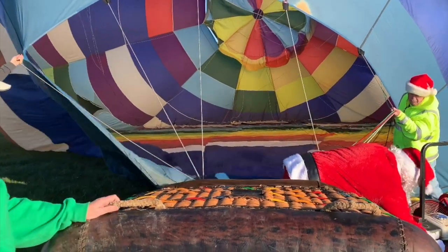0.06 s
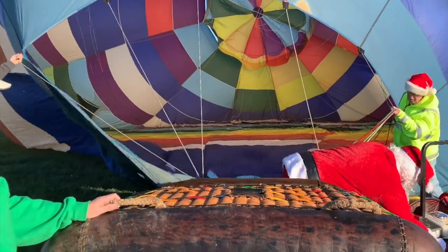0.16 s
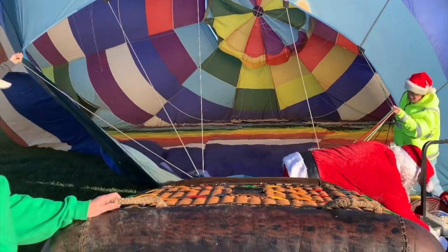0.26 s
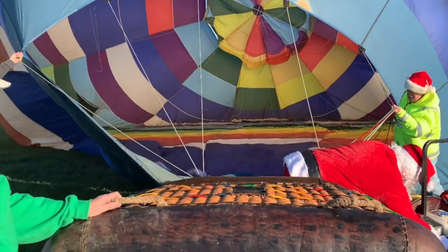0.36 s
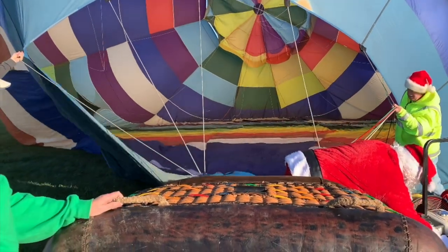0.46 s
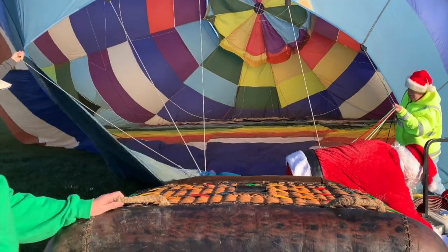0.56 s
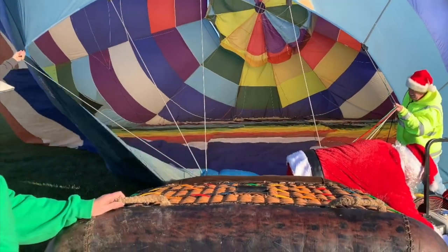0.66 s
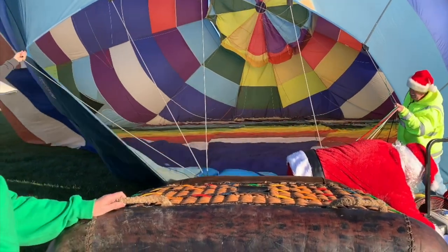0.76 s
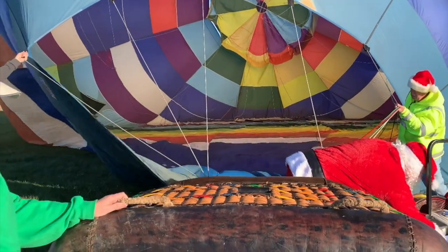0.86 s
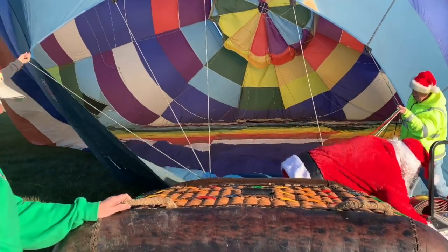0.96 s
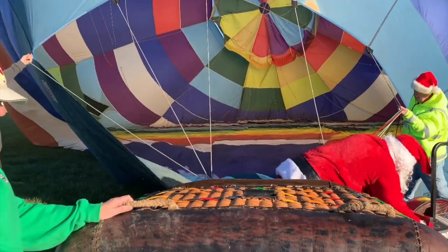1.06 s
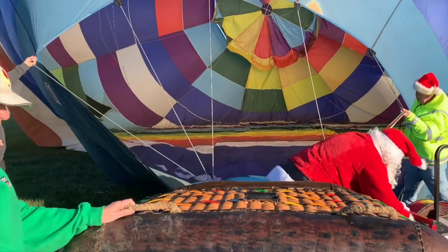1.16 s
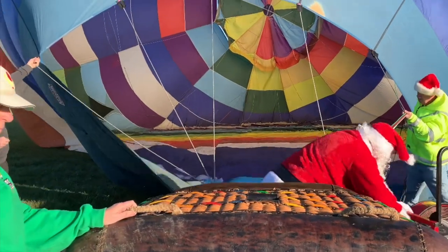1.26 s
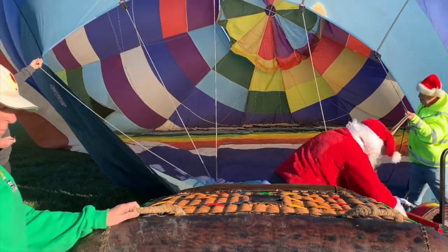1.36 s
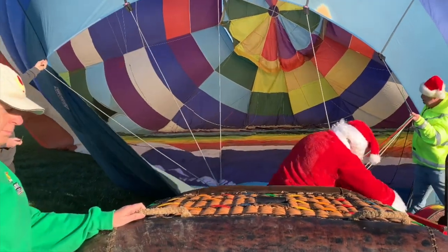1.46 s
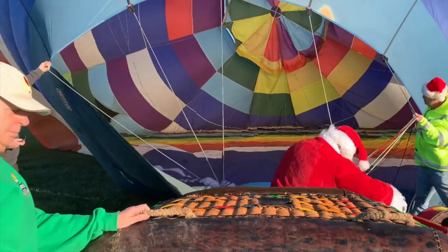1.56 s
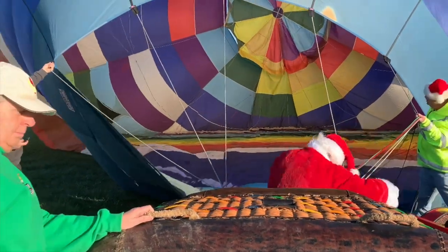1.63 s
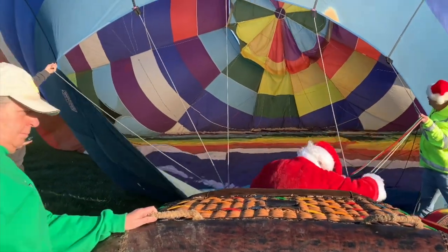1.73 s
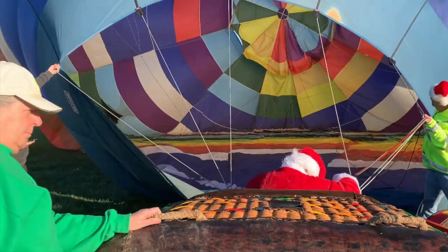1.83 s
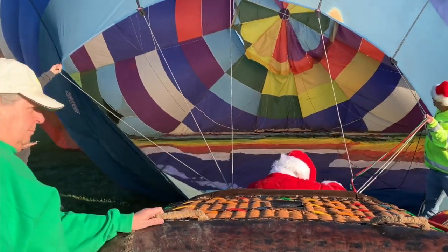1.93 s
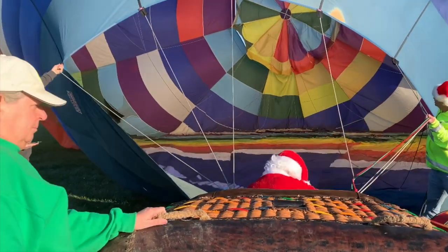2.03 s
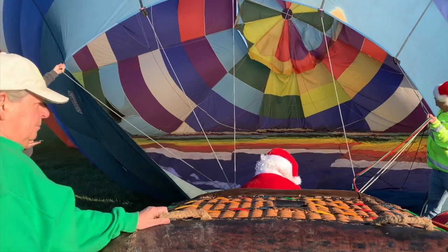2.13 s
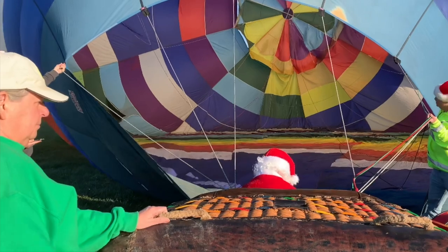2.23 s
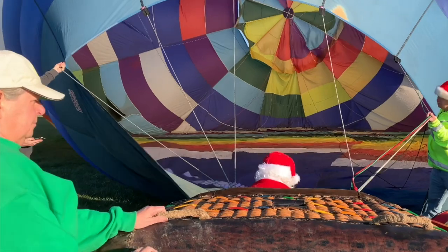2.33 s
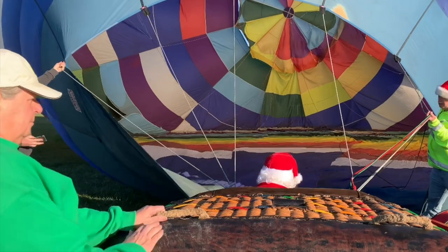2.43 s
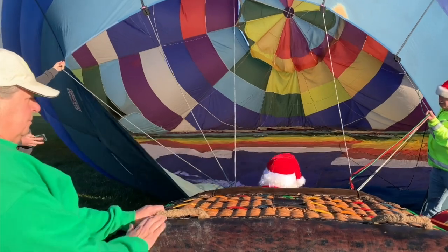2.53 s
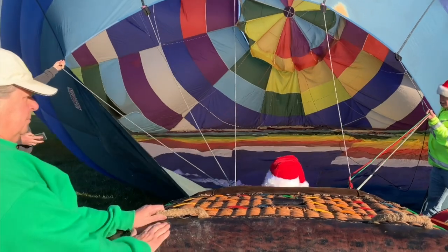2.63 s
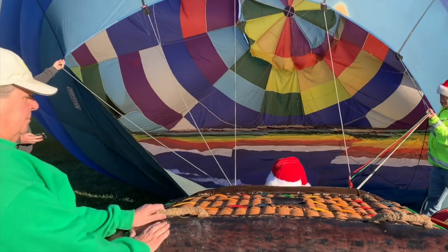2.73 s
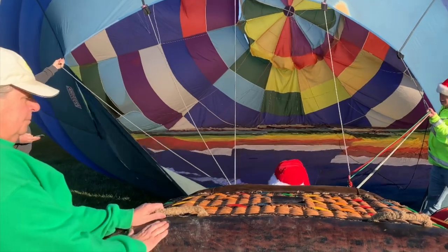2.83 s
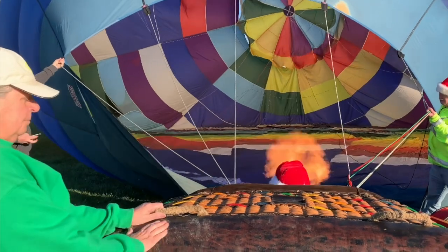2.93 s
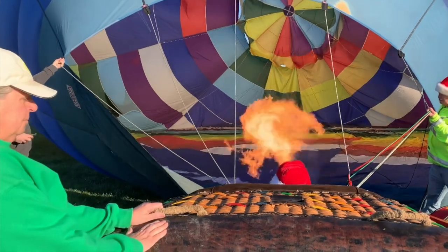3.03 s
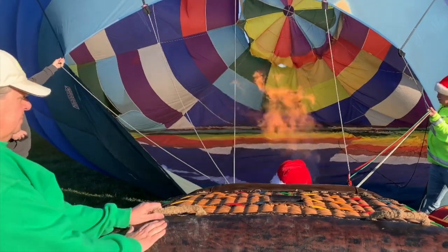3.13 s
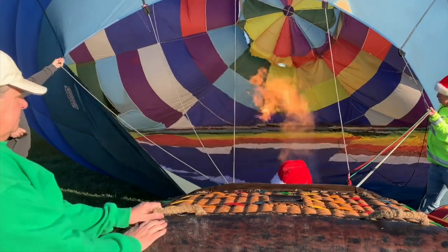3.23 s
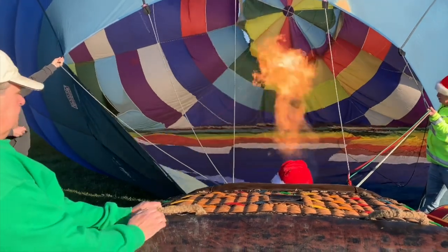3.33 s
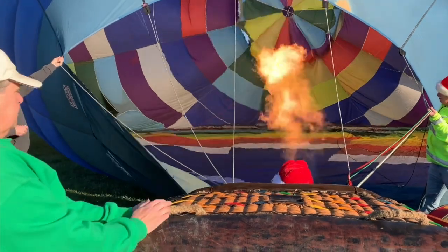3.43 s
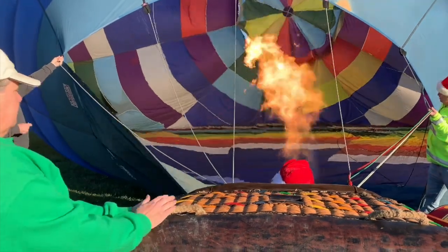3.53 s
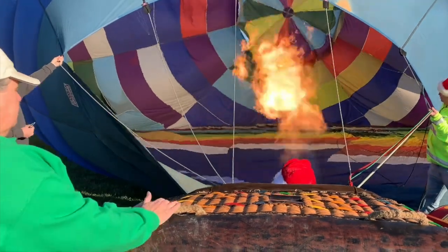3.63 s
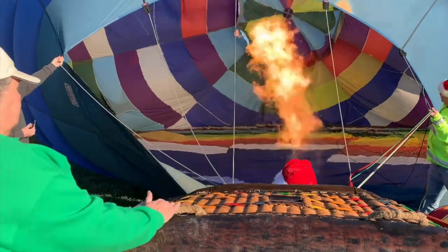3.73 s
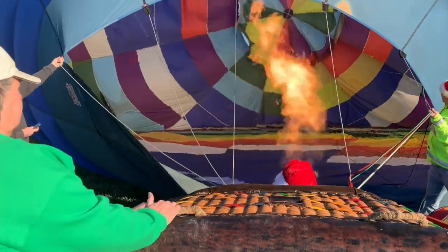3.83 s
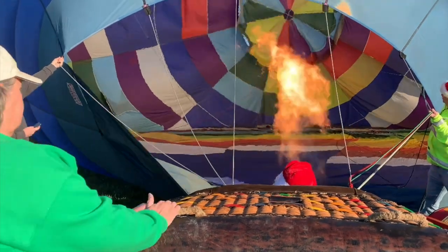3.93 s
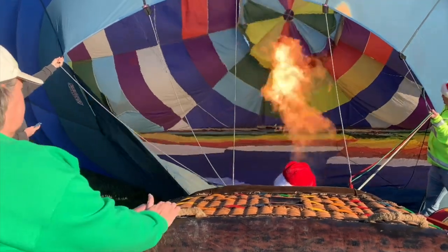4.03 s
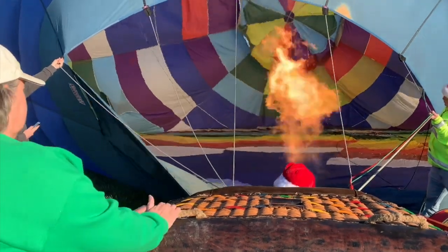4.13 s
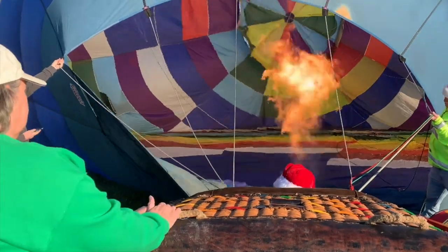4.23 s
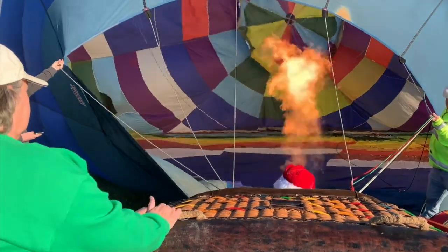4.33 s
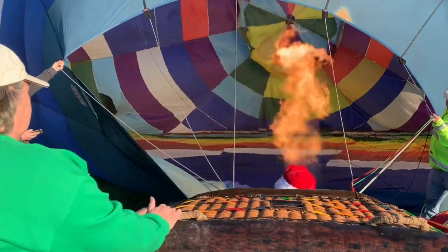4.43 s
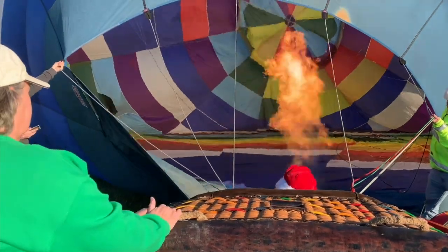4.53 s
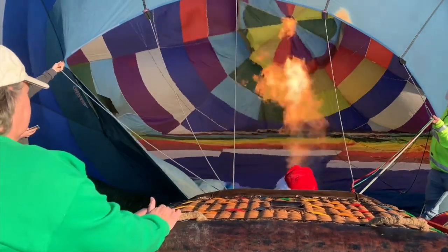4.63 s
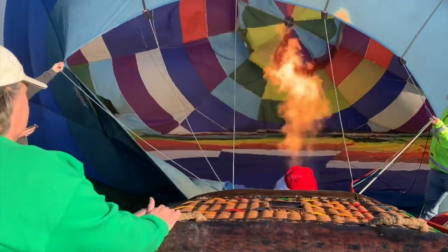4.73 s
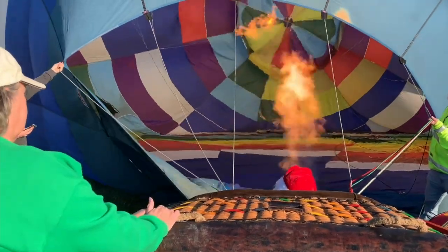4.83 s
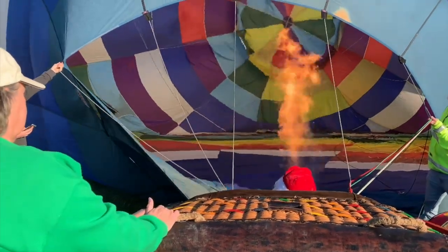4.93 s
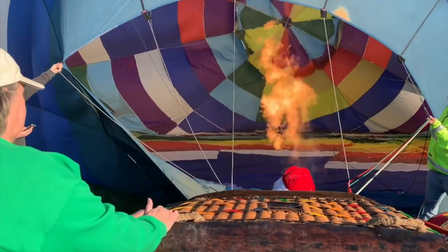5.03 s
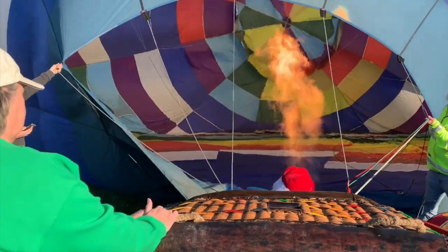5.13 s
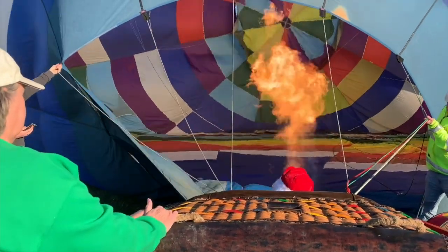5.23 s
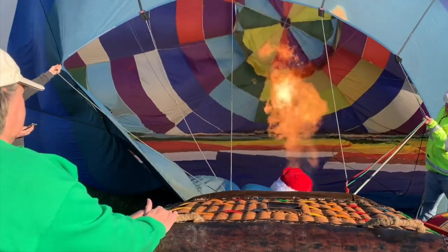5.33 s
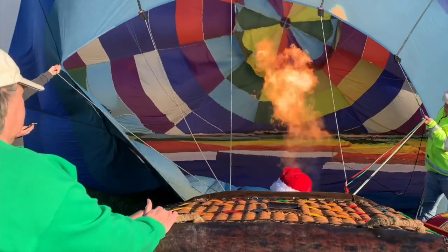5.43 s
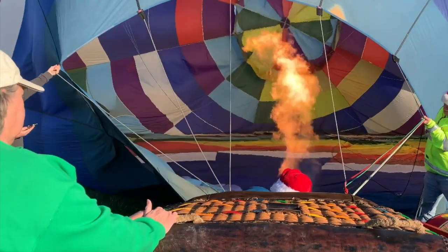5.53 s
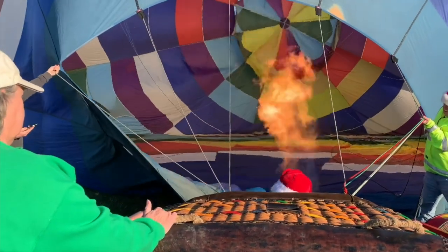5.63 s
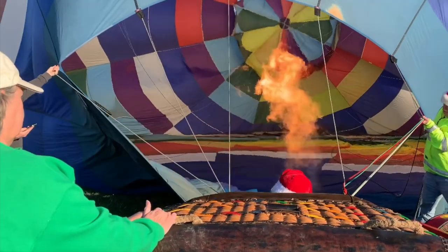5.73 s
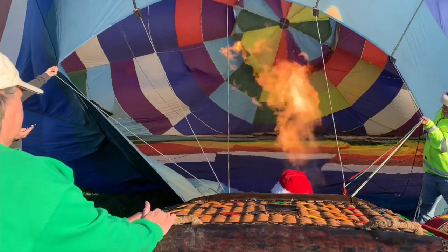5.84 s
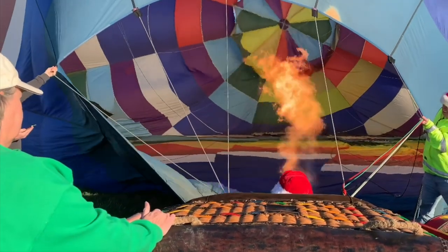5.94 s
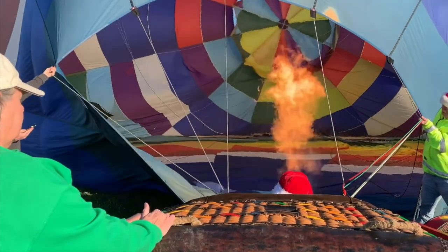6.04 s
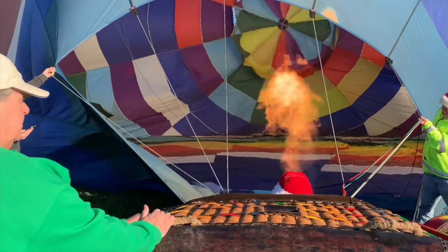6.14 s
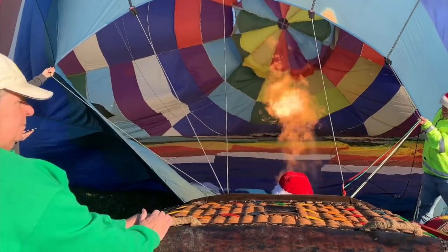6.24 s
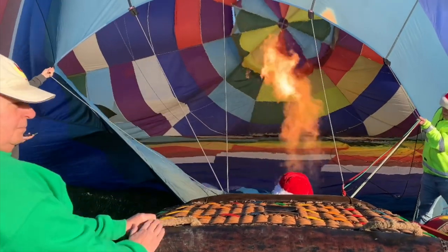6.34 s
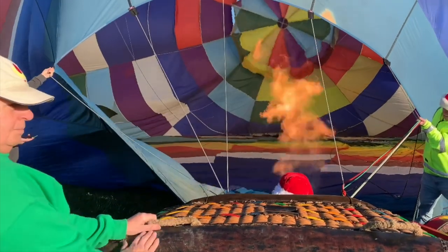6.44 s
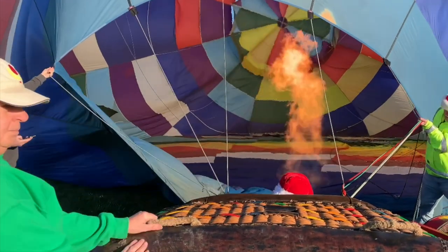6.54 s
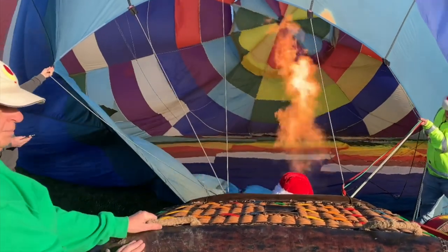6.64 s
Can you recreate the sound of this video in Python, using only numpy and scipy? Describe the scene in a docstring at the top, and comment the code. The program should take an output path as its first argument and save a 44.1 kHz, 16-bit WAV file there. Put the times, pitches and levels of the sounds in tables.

```python
"""On a field, a petrol fan blows up a balloon. The exhaust of its one-cylinder engine barks at full
speed, thumps dully when the throttle shuts, then pops along at idle. The fan blades hum and
push a rush of air, and loose metal clinks twice. Then a propane burner lights with a thump: its swirling
flame rumbles and roars while the gas jets hiss. A phone with two spaced microphones listens."""
import sys
import numpy as np
from scipy import signal
from scipy.fft import rfft, irfft, next_fast_len
from scipy.io import wavfile
from scipy.ndimage import uniform_filter1d, map_coordinates

SR = 44100
rng = np.random.default_rng(int(sys.argv[2]) if len(sys.argv) > 2 else 0)


def unload_audio(sound):
    """Save the sound as a 16-bit wav file, at the path given as the first command line argument."""
    columns = np.transpose(np.atleast_2d(sound))
    # keep every value between -1 and 1, then stretch to whole-number steps
    steps = np.round(np.clip(columns, -1, 1) * 32767)
    wavfile.write(sys.argv[1], SR, steps.astype(np.int16))


N = 295020

# Gas pressure at the burner jets: time_s, level_db
GAS_PRESSURE = [(2.83, -17), (2.96, -10), (3.15, -1), (3.6, -1.5), (4.5, 2.5), (5.0, 5), (5.15, 5.5),
                (5.4, 7), (5.6, 1.5), (6.1, 1.5), (6.45, 0), (6.69, 6)]
# Brief flare-ups of the flame: time_s, half_length_s, boost_db
FLARE_UPS = [(3.085, 0.071, 1.5), (4, 0.017, 0.5), (4.11, 0.023, 0.5), (5.205, 0.036, 2.5),
             (5.33, 0.028, 0.5), (6.354, .04, 1)]
# Tone colour of the burner's three noises: pitch_hz, relative_db
RUMBLE_COLOUR = [(15, -35), (25, -26), (55, -0.5), (90, 0), (130, 1.5), (170, -2), (220, -6.5),
                 (260, -10.5), (310, -19.5), (500, -45.5)]
ROAR_COLOUR = [(200, -31), (310, -6), (420, 1), (620, 0), (760, -9.5), (1000, -10.5), (1150, -7),
               (1340, -9), (1440, -15.5), (1750, -11), (3000, -20.5), (6000, -42)]
HISS_COLOUR = [(1500, -19), (3000, -7), (4500, -1), (6000, -4.5), (8000, 2), (11500, -2), (13500, 0.5),
               (15500, 0)]
# Ringing of the gas cloud's push as it lights: pitch_hz, width_hz, relative_db
IGNITION_RING = [(103, 48, 0), (230, 150, -7)]
# The balloon heaves in answer: delay_s, then rows of pitch_hz, width_hz, relative_db
BALLOON_HEAVE = (.006, [(58, 20, 2)])
# How fast the engine turns: time_s, cycles_per_s
ENGINE_SPEED = [(0.0, 29.41), (0.24, 29.59), (0.36, 27.7), (0.55, 24.66), (0.8, 21.4), (1.0, 19.24),
                (1.15, 18.35), (1.3, 18.23), (1.6, 18.78), (1.9, 19.15), (2.4, 19.23), (4.0, 19.24),
                (5.0, 19.17), (6.69, 19.18)]
# Exhaust puffs for the bark, thump and pop: place_in_cycle (0-1), sign, length_s
EXHAUST_PUFFS = [(0.882, 1, 0.0052), (0.602, 1, 0.0057), (.321, -1, 0.0033)]
# Low ring of each exhaust puff (bark, thump, pop): pitch_hz, width_hz, relative_db
BARK_RING = [(58, 30, -5.5), (105, 35, -1), (164, 45, 0), (240, 110, -12)]
THUMP_RING = [(100, 104, 0)]
POP_RING = [(105, 59, 0), (149, 20, -8)]
# Ringing of the exhaust pipe: pitch_hz, width_hz, relative_db
PIPE_RING = [(288, 40, 0), (480, 150, -5), (580, 120, -5)]
# Air sucked in before a thump: place_in_cycle, length_s, then rows of pitch_hz, width_hz, relative_db
AIR_SUCK = (.46, .0037, [(100, 94, 0)])
# Strength of the lowest blade tone, and of its overtones: time_s, level_db
HUM_LEVEL = [(0, -43), (.5, -42), (2.81, -42.5), (2.87, -48), (3.6, -47), (4.2, -41), (6.69, -42)]
OVERTONE_LEVEL = [(0, 6), (.35, 7), (.55, 3.5), (.7, -2), (.9, 6), (1.15, 4.5), (1.45, 5.5), (1.9, 1.5),
                  (2.6, 1), (4, 6.5), (5.5, 7.5), (6.69, 1)]
# The mix of blade overtones: overtone_number, level_db
BLADE_OVERTONES = [(2, -55.5), (3, -49), (4, -55.5), (5, -56.5), (6, -60)]
# How the fan cage colours each tone: pitch_hz, boost_db
CAGE_COLOUR = [(268, 0.5), (345, -2), (380, -9), (415, -2.5), (500, 1.5), (540, -1), (600, -0.5), (640, 0),
               (700, 2), (806, -0.5), (900, -2), (1100, -2), (1240, -7), (1345, 2.5), (1450, -2),
               (1600, 3.5), (1650, 5.5), (2100, -2), (2500, -3)]
# Fluttering tones: waves_per_cycle, width_hz, idle_db, db_per_speed_db, steady_part
FLUTTER_BANDS = [(21.62, 26.6, -46, 3.5, 0.39), (32.43, 79, -43.5, 1, .05)]
# Tone colour of the draught (idle, full speed), blade tips and balloon mouth: pitch_hz, relative_db
SLOW_AIR_COLOUR = [(200, -29), (260, -13.5), (340, -22.5), (480, -18.5), (620, -14.5), (720, -13),
                   (850, -12.5), (985, -17.5), (1290, -11.5), (1480, -18), (1770, -14), (2100, -17.5),
                   (2800, -25), (4500, -31), (7000, -58)]
FAST_AIR_COLOUR = [(200, -33), (300, -20.5), (355, -21), (480, -19), (640, -18), (760, -15), (885, -25),
                   (1010, -17), (1260, -8), (1490, -16.5), (1700, -9.5), (2800, -17.5), (4500, -25.5),
                   (7000, -69)]
SWISH_COLOUR = [(1500, -19), (2800, -2.5), (4000, -3), (6000, 4), (8300, 5), (10000, -3), (12500, -3),
                (15500, -3)]
BUFFET_COLOUR = [(20, -26), (60, 7.5), (150, 6.5), (230, 3.5), (320, -36)]
# Clinks of loose metal: time_s, strength_db
CLINK_HITS = [(1.006, -33), (1.484, -32)]
# How alike the left and right noise are: pitch_hz, likeness (1 = the same)
BURNER_LIKENESS = [(60, 1), (350, 0.98), (1700, 0.93), (2400, 0.4), (3300, 0.16), (6000, 0.069),
                   (7500, 0.94), (15000, 1)]
FAN_LIKENESS = [(60, 1), (350, 0.35), (1700, 0.83), (4500, 0.59), (6000, 0.17), (7500, 0.95), (15000, 1)]
# The phone's body shades the left microphone: pitch_hz, left_minus_right_db
BURNER_SHADE = [(60, -1), (300, -3), (700, -3), (2400, -1), (5000, -3.5), (6500, 0)]
FAN_SHADE = [(60, -1.5), (200, -4), (700, -8.5), (1700, -3.5), (3000, -2.5), (3800, -4), (5000, -10.5),
             (6500, 0)]
# How late the left microphone hears it: pitch_hz, delay_half_waves
BURNER_DELAY = [(0, 0), (350, .11), (1700, .43), (3800, .97), (7250, 3), (15900, 7)]
FAN_DELAY = [(0, 0), (350, .05), (1000, .14), (1700, .38), (3800, .87), (7250, 3), (15900, 7)]

IDLE_HZ, FULL_HZ = 19.2, 29.5  # engine cycles a second
SHUT_S, REFIRE_S, LIGHT_S = 0.28, 1.048, 2.8295  # throttle shuts, engine fires again, gas lights


def burner():
    """Gas hisses out first, then the swirling flame surges in lumps, louder with more gas pressure."""
    time_s = np.arange(N) / SR
    burning_s = np.maximum(time_s - LIGHT_S, 0)
    gas_db = over_time(GAS_PRESSURE)
    flare_db = sum(db * np.exp(-((time_s - at_s) / half_s) ** 2) for at_s, half_s, db in FLARE_UPS)
    pulse_db = 3.6 * np.exp(-burning_s / 0.19) * np.cos(2 * np.pi * 8 * burning_s)  # a new flame pulses
    surge = wobble(6)
    lumps = amp(0.17 * surge + 0.16 * wobble(18))
    rumble = unit(lumps * rush(RUMBLE_COLOUR, BURNER_LIKENESS, patchy_db=0.63))
    rumble *= amp(-18 + 0.088 * gas_db + 0.57 * burning_s + pulse_db + flare_db)
    roar_db = -30 + 0.23 * gas_db + 0.85 * burning_s + 0.36 * flare_db + 0.74 * surge
    roar = amp(roar_db) * rush(ROAR_COLOUR, BURNER_LIKENESS, patchy_db=1.02)
    hiss_db = -38 + 0.67 * gas_db + 0.22 * surge + 0.41 * wobble(9.1)
    hiss = amp(hiss_db) * rush(HISS_COLOUR, BURNER_LIKENESS, patchy_db=1.5)
    flame = ramp(LIGHT_S + 0.015, 0.03) * rumble + ramp(LIGHT_S, 0.063) * roar
    return flame + ramp(LIGHT_S - 0.15, 0.15) * hiss


def ignition():
    """The gas cloud lights and shoves the air, and the balloon heaves just after."""
    delay_s, heave_ring = BALLOON_HEAVE
    thump = puff(click(LIGHT_S), 0.007, IGNITION_RING) + puff(click(LIGHT_S + delay_s), 0.007, heave_ring)
    return amp(-5.5) * thump / np.abs(thump).max()


def engine(speed_db, cycle):
    """Exhaust puffs with a short low ring: barks under load, thumps while coasting, pops at idle."""
    lead = SR // 8  # start early, so that earlier firings are still ringing
    running = np.concatenate([-ENGINE_SPEED[0][1] * np.arange(lead)[::-1] / SR, cycle])
    bark, thump, pop = [
        sign * puff(beats(running, place, scatter_db=0.34), length_s, ring)
        for (place, sign, length_s), ring in zip(EXHAUST_PUFFS, (BARK_RING, THUMP_RING, POP_RING))]
    bark_place, pop_s = EXHAUST_PUFFS[0][0], EXHAUST_PUFFS[2][2]
    bark = bark + 0.63 * np.pad(bark, (round(0.0133 * SR), 0))[:len(bark)]  # a double knock
    # The sharp edge of each firing rings the pipe.
    rasp = puff(beats(running, bark_place, scatter_db=1.5, flip=True), 0.00084, PIPE_RING)
    bark = amp(-25.5) * unit(unit(bark[lead:]) + amp(-11.5) * unit(rasp[lead:]))

    suck_place, suck_s, suck_ring = AIR_SUCK
    suck = unit(puff(beats(cycle, suck_place, scatter_db=0.4), suck_s, suck_ring))
    thump = amp(-34.8 + 0.78 * speed_db) * unit(thump[lead:]) - amp(-36.2 - 0.63 * speed_db) * suck

    after_puff = puff(beats(cycle, 0.928, scatter_db=5, flip=True), pop_s, POP_RING)
    pop = unit(pop[lead:] - amp(-23) * after_puff)
    weak_start_db = -8.5 * np.exp(-np.abs(np.arange(N) / SR - REFIRE_S) / 0.16)
    idle = amp(-29.5 + weak_start_db) * (pop + amp(-26.5) * metal_ticks(cycle))
    kick = puff(click(1.016), pop_s, THUMP_RING)  # one hard pop as the engine catches again
    kick *= amp(-23) / np.abs(kick).max()

    shut, idling = ramp(SHUT_S - 0.12, 0.24), ramp(REFIRE_S, 0.008)
    return (1 - shut) * bark + (shut - idling) * thump + idling * idle + kick


def fan_blades(speed_hz, speed_db, cycle):
    """Passing blades chop the air into a hum, overtones and flutter that fall in pitch as they slow."""
    passes = 14  # blades going by in one engine cycle

    def tone(number, waver_db):
        level_db = over_pitch(CAGE_COLOUR, number * passes * speed_hz) + waver_db * wobble(12)
        turns = passes * cycle + 0.016 * wobble(12)
        return np.sqrt(2) * amp(level_db) * np.cos(2 * np.pi * number * turns)

    sound = amp(over_time(HUM_LEVEL)) * tone(1, waver_db=1.15)
    overtones = sum(amp(db) * tone(round(number), waver_db=1.76) for number, db in BLADE_OVERTONES)
    sound += amp(0.1 + 2.2 * speed_db + over_time(OVERTONE_LEVEL)) * overtones
    for waves, width_hz, idle_db, slope, steady in FLUTTER_BANDS:
        drift = unit(filtered(rng.standard_normal((2, N)), lambda hz: 1 / (1 + (hz / width_hz) ** 2)))
        angle = 2 * np.pi * waves * cycle
        flutter = unit((drift[0] + steady) * np.cos(angle) + drift[1] * np.sin(angle))
        sound += amp(idle_db + slope * speed_db + over_pitch(CAGE_COLOUR, waves * speed_hz)) * flutter
    return sound


def fan_air(speed_hz, speed_db, cycle):
    """The draught rushes, the blade tips swish, and swirling air buffets the mouth of the balloon."""
    coasting = ramp(SHUT_S, 0.13) * (1 - ramp(REFIRE_S, 0.13))
    dip_db = -1 * coasting  # the air eases while the engine is not firing
    fast = np.clip((speed_hz - IDLE_HZ) / (FULL_HZ - IDLE_HZ), 0, 1)
    slow_air = np.sqrt(1 - fast) * rush(SLOW_AIR_COLOUR, FAN_LIKENESS, patchy_db=1.38)
    fast_air = np.sqrt(fast) * rush(FAST_AIR_COLOUR, FAN_LIKENESS, patchy_db=1.5)
    throb_db = 0.5 * np.cos(2 * np.pi * (cycle - 0.5))
    draught = amp(-35.5 + 2.81 * speed_db + throb_db + dip_db + 0.6 * wobble(3)) * (slow_air + fast_air)
    swish_db = -50.5 + 3.87 * speed_db + dip_db + 0.6 * wobble(5)
    swish = amp(swish_db) * rush(SWISH_COLOUR, FAN_LIKENESS, patchy_db=0.7)
    buffet = amp(-43 + 1.5 * speed_db - 3 * coasting) * rush(BUFFET_COLOUR, FAN_LIKENESS, patchy_db=2.5)
    return draught + swish + buffet


def metal_ticks(cycle):
    """Metal ticks once a cycle, just before the idle pop: a short burst of bright noise."""
    age_s = np.arange(SR // 25) / SR
    shape = amp(-60 * age_s / 0.063) * (1 - np.exp(-age_s / 0.004))
    bursts = signal.fftconvolve(beats(cycle, 0.233, scatter_db=2.5), shape)[:N]
    return unit(bursts * filtered(rng.standard_normal(N), ringing([(4300, 3600, 0)])))


def frame_clinks():
    """Loose metal knocks on the frame and dies away fast."""
    age_s = np.arange(SR // 25) / SR
    hits = np.zeros(N)
    for start_s, db in CLINK_HITS:
        burst = amp(db - 60 * age_s / 0.037) * rng.standard_normal(len(age_s))
        hits[round(start_s * SR):][:len(burst)] = burst
    return filtered(hits, ringing([(5500, 4900, 0)]))


def rush(colour, likeness, patchy_db):
    """Stereo noise of rushing gas, with random louder and softer patches in pitch and time."""
    grid = signal.stft(rng.standard_normal((2, N)), nperseg=512)[2]
    patches = uniform_filter1d(uniform_filter1d(rng.standard_normal(grid.shape[1:]), 6, 0), 10, 1)
    noise = signal.istft(grid * amp(patchy_db * unit(patches)), nperseg=512)[1][:, :N]

    def response(hz):
        spread = np.arccos(np.clip(over_pitch(likeness, hz), -1, 1)) / 2
        return amp(over_pitch(colour, hz)) * [np.cos(spread), np.sin(spread)]

    middle, side = filtered(noise, response)
    return unit(np.array([middle + side, middle - side]))


def puff(clicks, length_s, ring):
    """Each click becomes a soft puff of gas that sets the given pitches ringing."""
    puffs = signal.fftconvolve(clicks, np.hanning(round(length_s * SR)))[:len(clicks)]
    return filtered(puffs, ringing(ring))


def ringing(ring):
    """A filter from rows of pitch_hz, width_hz, level_db; squared, so a ring swells before it dies."""
    return lambda hz: sum(amp(db) * (1j * hz * width / (pitch ** 2 - hz ** 2 + 1j * hz * width)) ** 2
                          for pitch, width, db in ring)


def beats(cycle, place, scatter_db, flip=False):
    """One click of random strength at this place in each cycle; flip swaps the strong and weak ones."""
    at = np.flatnonzero(np.diff(np.floor(cycle - place)) > 0)
    level_db = scatter_db * rng.standard_normal(N // 256)[:len(at)]
    clicks = np.zeros(len(cycle))
    clicks[at] = amp(-level_db if flip else level_db)
    return clicks


def click(time_s):
    """A single click at the given time."""
    return 1.0 * (np.arange(N) == round(time_s * SR))


def wobble(rate_hz):
    """A smooth random curve through rate_hz points a second."""
    at = np.arange(0, N + 64, 64)
    points = rng.standard_normal(int(N * rate_hz / SR) + 4)
    return np.interp(np.arange(N), at, map_coordinates(points, [at * rate_hz / SR]))


def ramp(start_s, length_s):
    """Rises from 0 to 1 over the given time."""
    return np.clip((np.arange(N) / SR - start_s) / length_s, 0, 1)


def over_time(rows):
    """Joins rows of time_s, value into one value per sample."""
    return np.interp(np.arange(N) / SR, *np.transpose(rows))


def over_pitch(rows, hz):
    """Reads between rows of pitch_hz, value on a log scale of pitch."""
    pitches, values = np.transpose(rows)
    return np.interp(np.log(hz + 1), np.log(pitches + 1), values)


def filtered(sound, response):
    """Scales and delays each frequency by response(hz)."""
    length = sound.shape[-1]
    padded = next_fast_len(length + SR // 2)
    return irfft(rfft(sound, padded) * response(np.fft.rfftfreq(padded, 1 / SR)), padded)[..., :length]


def amp(db):
    """Turns decibels into a multiplier."""
    return 10 ** (np.asarray(db) / 20)


def unit(sound):
    """Scales a sound to an average (rms) level of 1."""
    return sound / np.sqrt(np.mean(sound ** 2) + 1e-20)


def at_microphones(sound, shade, delay):
    """Sound reaches the right microphone first, and the phone's body shades the left one."""
    def response(hz):
        lag = np.pi * np.interp(hz, *np.transpose(delay))
        left_vs_right = over_pitch(shade, hz) * np.log(10) / 20 - 1j * lag
        return np.exp(np.outer([0.5, -0.5], left_vs_right))

    return filtered(sound, response)


def scene():
    """The fan stands off to the right, the burner nearer the middle."""
    speed_hz = over_time(ENGINE_SPEED)
    speed_db = 20 * np.log10(speed_hz / IDLE_HZ)  # 0 at idle
    cycle = np.cumsum(speed_hz) / SR  # engine cycles so far
    fan = engine(speed_db, cycle) + frame_clinks()
    fan = fan + fan_blades(speed_hz, speed_db, cycle) + fan_air(speed_hz, speed_db, cycle)
    fire = burner() + ignition()
    return at_microphones(fan, FAN_SHADE, FAN_DELAY) + at_microphones(fire, BURNER_SHADE, BURNER_DELAY)


def record(dry):
    """The very highest treble is cut off."""
    return filtered(dry, lambda hz: hz < 15730)


dry = scene()
out = record(dry)
unload_audio(out)
```